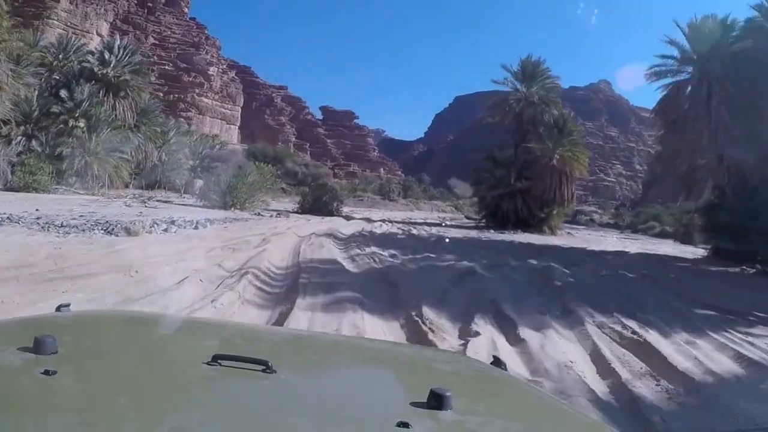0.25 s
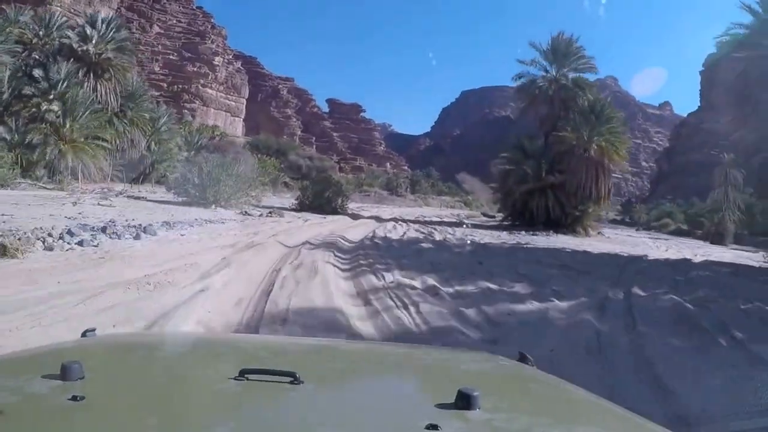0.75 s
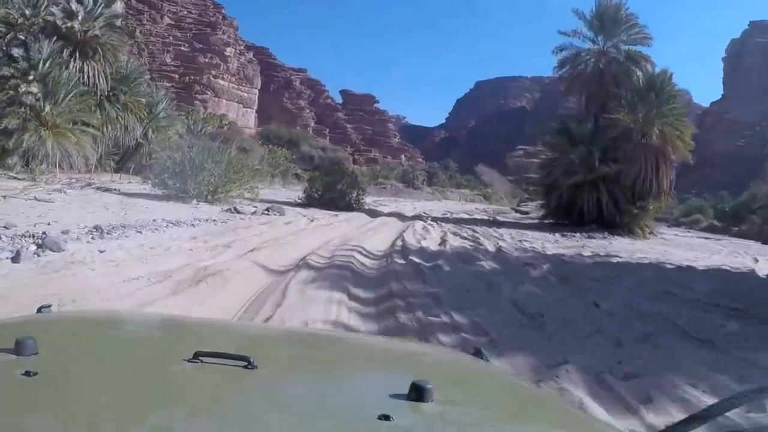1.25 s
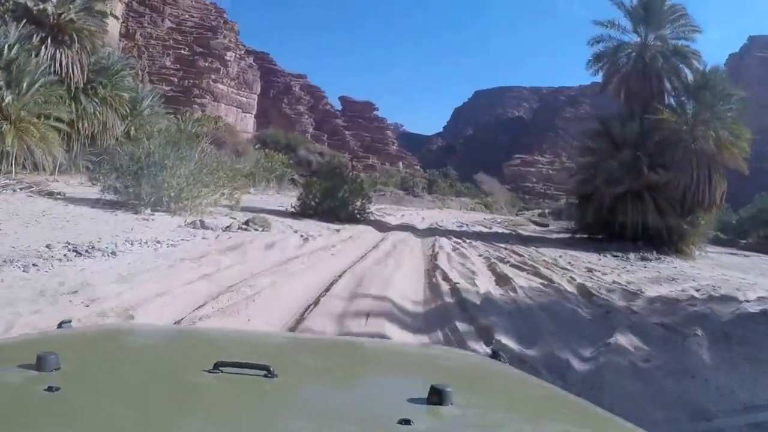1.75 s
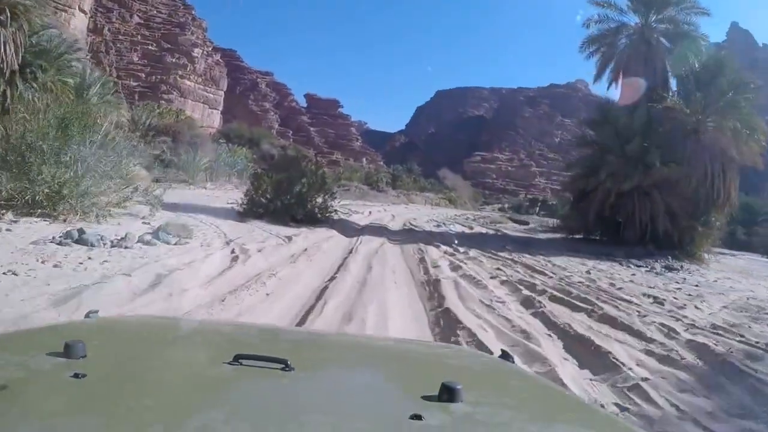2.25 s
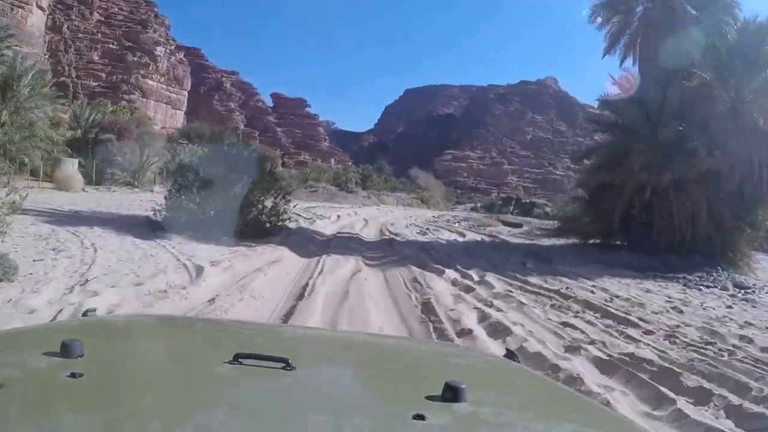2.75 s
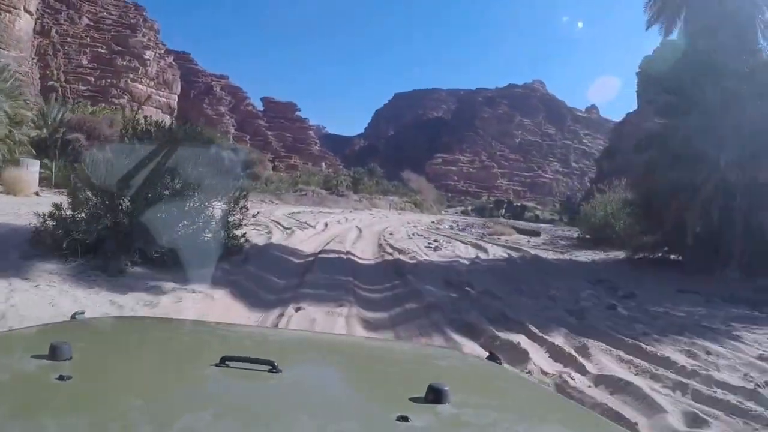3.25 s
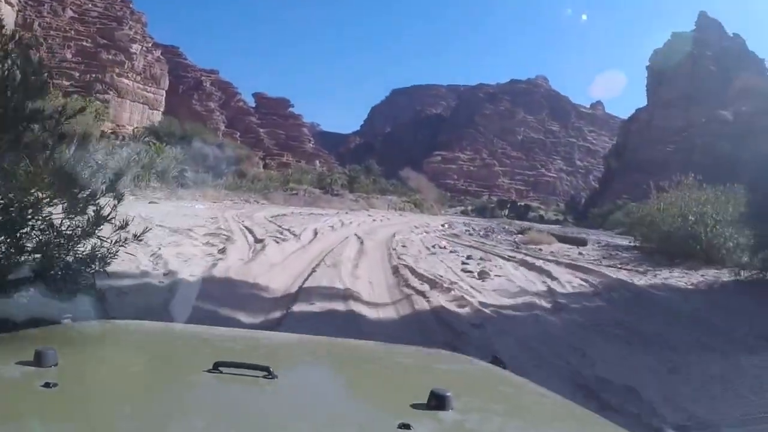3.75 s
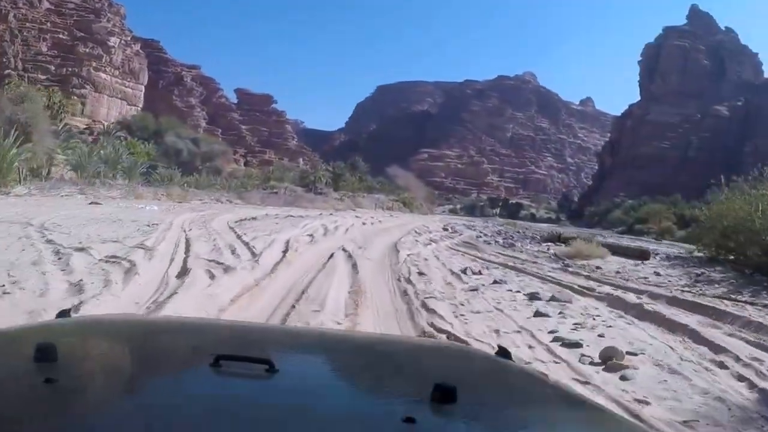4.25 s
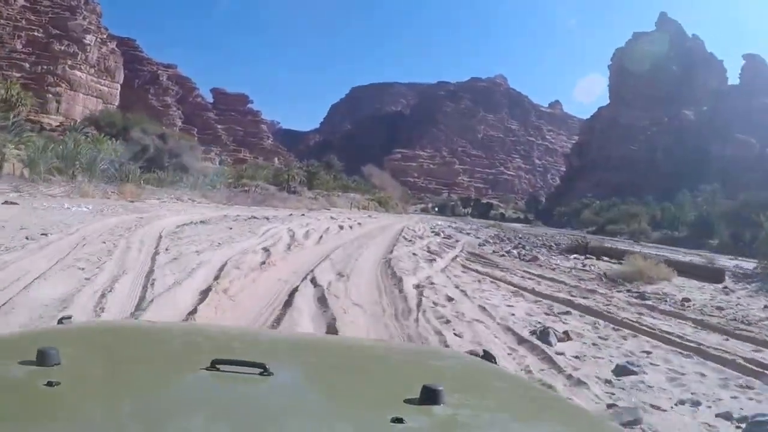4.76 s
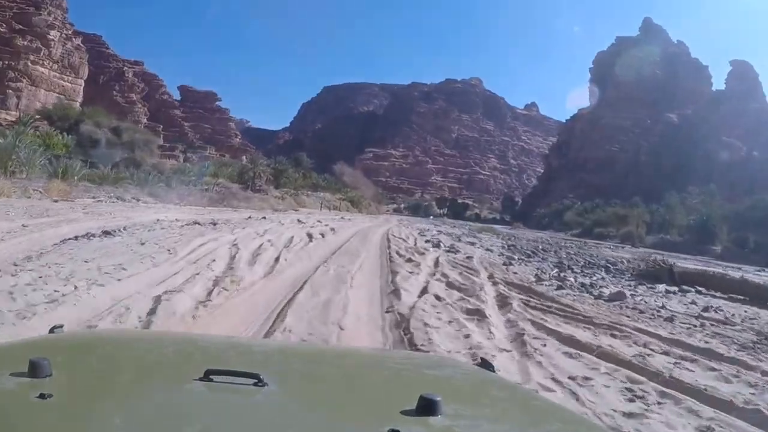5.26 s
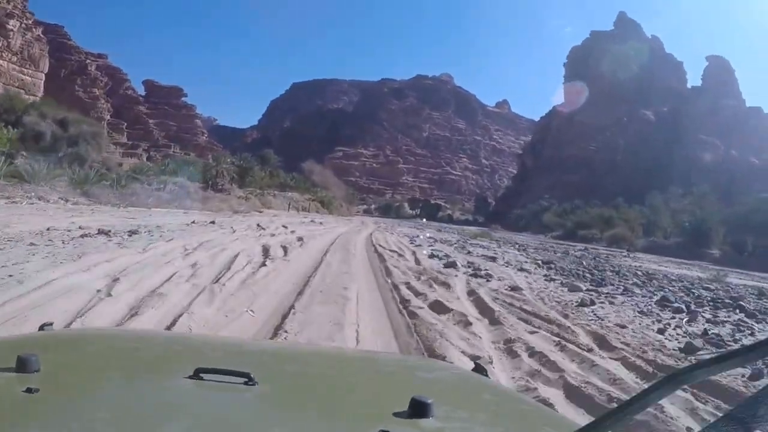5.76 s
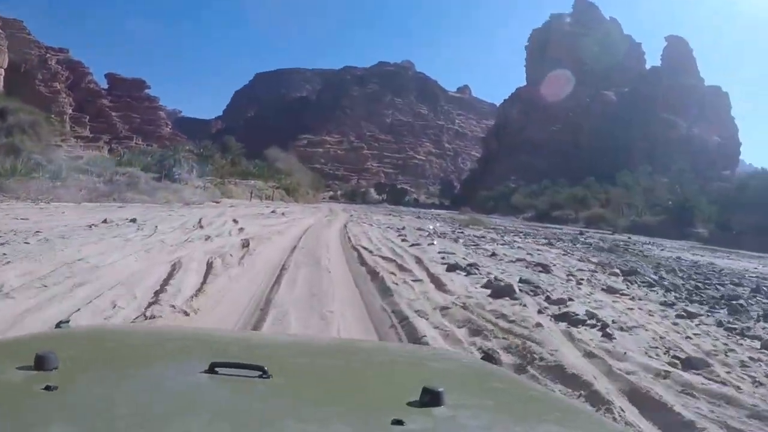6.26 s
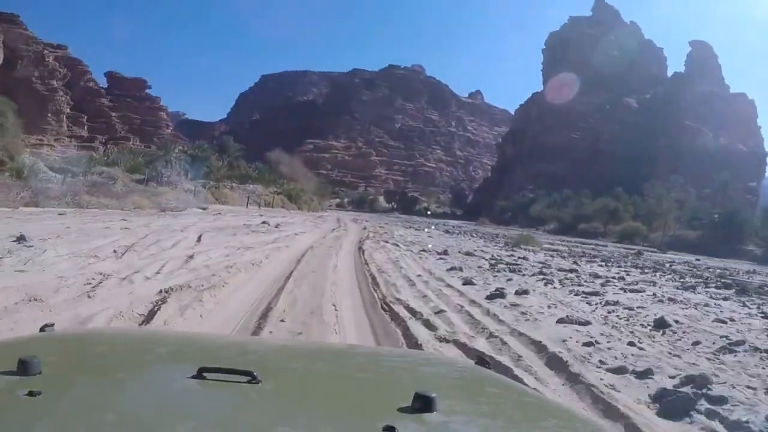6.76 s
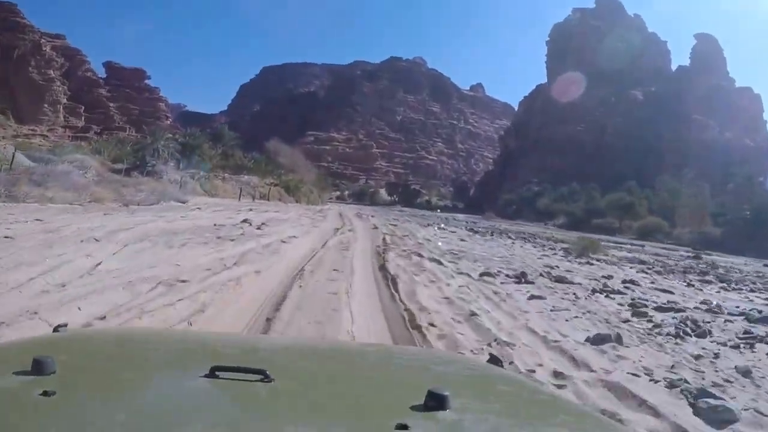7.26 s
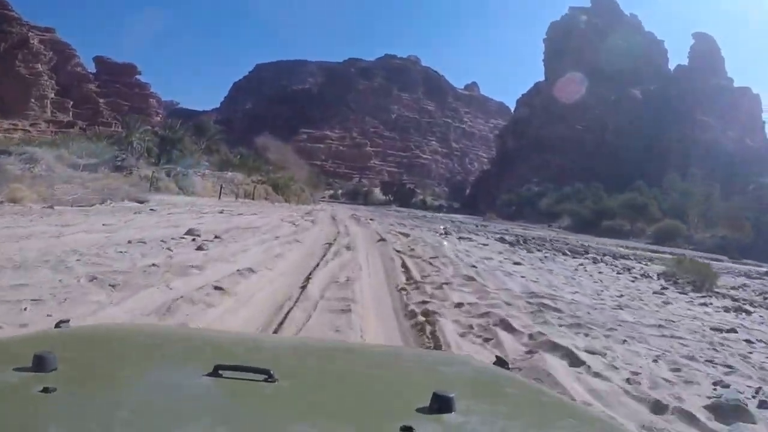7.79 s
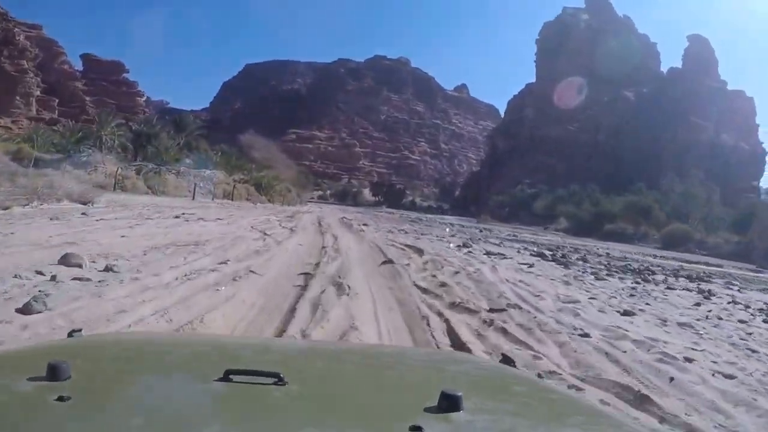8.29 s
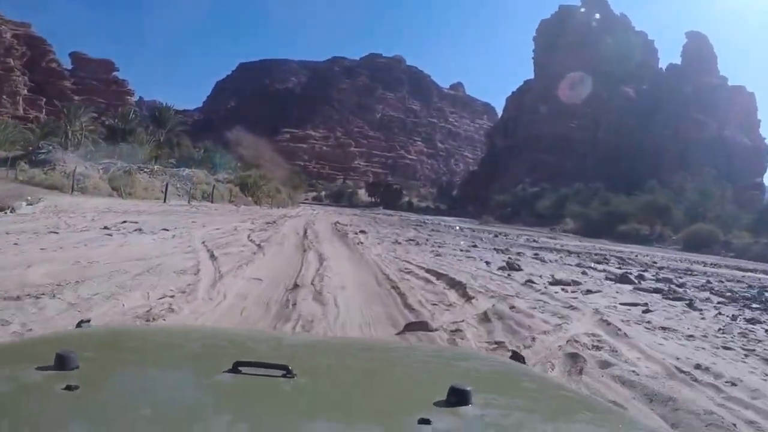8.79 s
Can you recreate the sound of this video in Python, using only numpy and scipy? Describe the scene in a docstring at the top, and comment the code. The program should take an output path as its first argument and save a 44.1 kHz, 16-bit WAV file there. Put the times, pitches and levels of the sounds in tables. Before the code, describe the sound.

An engine growls low inside a bumping vehicle cabin, its pitch sinking, then climbing past the middle and easing down. Low air pressure rumbles throughout, with muffled floor roar and fine trim chatter. Jolts bring dull floor thuds, short sheet-metal taps, dry plastic knocks and tiny jingles, densest early and just after halfway. Later the drone is steadier with sparse ticks. The microphone is inside, near the front seat, in mono.

```python
"""Off-road cabin on sand and stones

Inside a vehicle whose six-cylinder engine slows, pulls and slows again: a stack of gliding sine orders.
The cabin booms, thumps and roars with the ruts, as shaped noise, while the trim chatters.
Blows ring decaying notes in the floor and sheet metal; trim knocks and small metal parts jingle,
as noise bursts that excite resonances."""
import sys
import numpy as np
from scipy import signal
from scipy.fft import rfft, irfft, next_fast_len
from scipy.io import wavfile
from scipy.ndimage import uniform_filter1d, map_coordinates

SR = 44100
rng = np.random.default_rng(int(sys.argv[2]) if len(sys.argv) > 2 else 0)


def unload_audio(sound):
    """Save the sound as a 16-bit wav file, at the path given as the first command line argument."""
    columns = np.transpose(np.atleast_2d(sound))
    # keep every value between -1 and 1, then stretch to whole-number steps
    steps = np.round(np.clip(columns, -1, 1) * 32767)
    wavfile.write(sys.argv[1], SR, steps.astype(np.int16))


N = 398223
TIME = np.arange(N) / SR  # seconds

# throttle, as the base level of the engine orders: time_s, load_db
LOAD = [(0, -47), (0.4, -47), (0.75, -48.5), (1.05, -54), (2.1, -52.5), (2.45, -56.5), (2.7, -43.5),
        (3.25, -45), (3.9, -43), (4.5, -38.5), (4.75, -43), (5.1, -45), (5.6, -56), (6.1, -51),
        (6.5, -50.5), (6.9, -55.5), (7.3, -47.5), (7.9, -48.5), (8.4, -44), (8.65, -47), (9.03, -65.5)]
# engine speed: time_s, rate_hz (four-stroke cycles per second)
CYCLE_RATE = [(0.0, 24.64), (0.6, 23.44), (1.1, 22.96), (1.6, 21.96), (2.0, 21.94), (2.47, 19.72),
              (2.68, 21.52), (2.92, 21.7), (3.7, 23.3), (4.1, 24.28), (4.6, 25.6), (4.96, 26.82),
              (6.18, 29.98), (6.62, 29.92), (7.06, 27.76), (8.1, 25.28), (8.27, 25.66), (8.7, 24.96),
              (9.03, 23.92)]


def amp(db):
    """Decibels to gain."""
    return 10 ** (np.asarray(db) / 20)


def unit(x):
    """Scaled to rms 1."""
    return x / np.sqrt(np.mean(x ** 2) + 1e-20)


def along(points, hz):
    """Value at hz from (Hz, value) points on a log frequency axis."""
    f, v = np.transpose(points)
    return np.interp(np.log(hz + 1), np.log(f + 1), v)


def curves(rows):
    """One value per sample for each column after the time."""
    s, *columns = np.transpose(rows)
    return [np.interp(TIME, s, column) for column in columns]


def wobble(rate):
    """A smooth random curve, rate knots a second."""
    coarse = TIME[::64]
    knots = rng.standard_normal(int(N * rate / SR) + 4)
    return np.interp(TIME, coarse, map_coordinates(knots, [coarse * rate]))


def filtered(x, response):
    """x passed through a response given as a function of frequency."""
    m = next_fast_len(N + SR // 2)
    return irfft(rfft(x, m) * response(np.fft.rfftfreq(m, 1 / SR)), m)[:N]


def noise(spectrum, even, span):
    """Coloured noise of rms 1 whose own swells over span seconds are evened out by the share even."""
    x = filtered(rng.standard_normal(N), lambda hz: amp(along(spectrum, hz)))
    swell = np.sqrt(np.abs(uniform_filter1d(unit(x) ** 2, size=int(span * SR))) + 1e-3)
    return unit(x / swell ** np.clip(even, 0, 1))


def flurries(per_s, t60):
    """Random sudden swells that die away, a few large among many small."""
    t = TIME[:SR // 8]
    ticks = (rng.random(N) < per_s / SR) * amp(5.27 * rng.exponential(size=N).clip(0, 3))
    swell = t / t60 * 18 * amp(-60 * t / t60)
    return signal.fftconvolve(ticks, swell)[:N]


def cabin_boom():
    """Ruts shake the chassis and the cabin air booms: low noise that heaves and wavers."""
    # boom level: time_s, level_db
    heave = [(0.0, -6), (0.1, -25.5), (0.17, -13.5), (0.25, -19), (0.38, -12), (0.64, -14), (0.72, -18.5),
             (1.21, -11.5), (1.31, -23), (2.3, -19.5), (2.48, -13.5), (2.68, -21.5), (2.79, -14),
             (2.89, -21.5), (3.0, -13.5), (3.08, -22.5), (3.74, -14.5), (3.93, -20.5), (4.26, -13),
             (4.51, -19), (4.59, -12.5), (4.93, -12), (5.11, -18), (5.36, -12), (6.1, -16.5), (6.75, -12.5),
             (6.84, -17.5), (7.3, -18.5), (7.46, -11), (7.56, -21.5), (7.92, -16.5), (8.62, -14.5),
             (8.95, -11.5)]
    # colour of the boom: pitch_hz, relative level_db
    boom_colour = [(6, -35), (12, -25.5), (20, 1.5), (33, -1), (43, -9.5), (60, -15.5), (90, -31.5),
                   (150, -120)]
    level_db = curves(heave)[0] + 0.98 * wobble(8)
    return amp(level_db) * noise(boom_colour, even=0.81, span=0.099)


def ground():
    """Ruts shake the chassis: the floor thumps and roars, the trim chatters in grains."""
    # roughness of the track: time_s, shake_db (0 is even ground), thump level_db
    track = [(0.03, -1.5, -34), (0.31, 0.5, -34.5), (0.42, 6, -28), (0.5, 0, -22), (0.69, 3, -29),
             (0.8, -1, -33.5), (1.17, 5, -34), (1.55, 1.5, -27.5), (1.81, 5.5, -31), (2.0, 0, -27.5),
             (2.3, 0, -33), (2.9, -0.5, -32.5), (4.4, -0.5, -37.5), (4.77, 8.5, -17), (5.11, -2, -28.5),
             (5.37, 7.5, -27.5), (5.49, 3.5, -23.5), (5.61, 4.5, -26.5), (5.97, -3, -36),
             (6.2, -2.5, -30.5), (6.94, -2.5, -38.5), (7.5, -0.5, -34.5), (8.1, -1, -36), (8.4, 0, -34),
             (8.84, 0.5, -36.5), (9.0, 4, -36.5)]
    # noise colours of floor thump, floor roar and trim chatter: pitch_hz, relative level_db
    thump_colour = [(32, -12), (55, -8.5), (70, -13.5), (108, -8), (156, -18.5), (190, -18.5), (250, -37.5),
                    (420, -120)]
    roar_colour = [(100, -21.5), (170, -9), (262, -3), (340, -9), (395, -5), (464, -11), (554, -9),
                   (784, -12.5), (861, -20.5), (1600, -37.5), (2080, -66), (3520, -120)]
    chatter_colour = [(710, -24), (1200, -5.5), (2080, -4), (2900, -7.5), (3260, -9), (4930, -12.5),
                      (8210, -20), (12600, -20.5), (15200, -26.5)]
    shake_db, thump_db = curves(track)
    load_db = curves(LOAD)[0]
    thump = amp(thump_db) * noise(thump_colour, even=0.13, span=0.06)

    judder = wobble(12)  # quick shakes shared by floor and trim
    # the floor pulses once an engine cycle
    beat = 1 + 0.2 * np.cos(2 * np.pi * np.cumsum(curves(CYCLE_RATE)[0]) / SR)
    roar_swell = beat * (1 + 0.14 * flurries(25, t60=0.064)) * amp(0.37 * judder)
    roar = unit(roar_swell * noise(roar_colour, even=0.25, span=0.068))
    grains = (1 + 0.084 * flurries(110, t60=0.036)) * amp(1.0 * judder)
    chatter = unit(grains * noise(chatter_colour, even=0, span=.05))

    # the roar grows by 0.78 dB per dB of shake and 0.2 dB per dB of engine load
    roar_db = -37 + 0.78 * shake_db + 0.2 * (load_db - load_db.mean())
    chatter_db = -60 + shake_db
    return thump + amp(roar_db) * roar + amp(chatter_db) * chatter


def jingles():
    """Small metal parts chatter against each other for the length of a jolt and ring at thin high modes."""
    # jolts: start_s, level_db (drive, before the modes), length_s
    jolts = [(0.192, -55, 0.04), (0.548, -50, 0.0046), (0.722, -45.5, 0.031), (1.12, -50, 0.022),
             (1.185, -58, .02), (1.232, -55, .02), (1.418, -52, .012), (1.456, -56, .018),
             (1.471, -42, 0.023), (1.693, -51.5, 0.04), (1.763, -29, 0.027), (1.79, -36.5, 0.019),
             (1.855, -50, .004), (1.972, -51, 0.03), (2.164, -57, 0.055), (2.706, -49, .006),
             (2.933, -47, 0.011), (4.9, -53, 0.026), (5.161, -47, 0.0047), (8.62, -54, .016)]
    # modes of the metal parts: pitch_hz, width_hz (broadened 3.5 times below), relative level_db
    metal = [(6790, 24, -5), (10650, 64, -6.5), (11100, 28, -1.5), (11960, 27, 4), (12300, 160, -14),
             (13800, 35, -3), (14300, 38, -3), (14900, 61, 2)]
    out, t = np.zeros(N + SR), TIME[:8192]
    f = np.fft.rfftfreq(len(t), 1 / SR)
    for s, db, length in jolts:
        jolt = (1 - np.exp(-(t / 0.0014) ** 2)) / (1 + (t / max(length, .002)) ** 5.2)
        # sparse touches: about one sample in eight
        touches = jolt * rng.standard_normal(len(t)) * (rng.random(len(t)) < .12)
        ring = sum(amp(level + rng.normal(0, 4.7)) * 1j * f * 1.95 * w / (c * c - f * f + 3.5j * f * w)
                   for c, w, level in metal)
        click = amp(-15) * (f / 12000)  # bright direct sound of the contacts
        out[round(s * SR):][:len(t)] += amp(db + 15) * irfft(rfft(touches) * (ring + click))
    return out[:N]


def knocks():
    """Each trim knock is a flurry of contacts: the note of the part hit, its neighbours and a broad crack."""
    # knocks: start_s, level_db (4 dB below the peak), pitch_hz, length_s
    hits = [(0.201, -46, 3880, 0.05), (0.202, -46, 2020, 0.013), (0.376, -42, 2050, 0.012),
            (0.448, -50.5, 4200, 0.013), (0.483, -51.5, 2190, .012), (0.662, -43, 4260, 0.011),
            (0.719, -41, 2600, 0.022), (1.111, -44, 4460, 0.017), (1.671, -51, 2800, .012),
            (1.752, -51, 4800, .012), (1.763, -36.5, 2780, 0.017), (1.822, -44.5, 2900, 0.01),
            (1.856, -53, 4000, .004), (1.884, -43.5, 3530, 0.021), (2.0, -52, 5300, 0.017),
            (2.705, -47.5, 3380, 0.0058), (2.78, -51.5, 2400, 0.1), (3.056, -46.5, 4900, 0.0052),
            (3.448, -52, 4360, 0.024), (3.506, -47.5, 4280, 0.007), (3.513, -46, 2600, 0.0065),
            (4.434, -46.5, 2470, 0.042), (4.578, -44, 2330, 0.008), (4.626, -50, 4300, .012),
            (4.709, -44, 4370, 0.0077), (4.841, -44, 3620, 0.027), (5.321, -43, 4030, 0.019),
            (5.333, -50, 5500, 0.0069), (5.346, -36, 2490, 0.0054), (5.517, -45, 2100, 0.0083),
            (5.584, -46, 2540, .012), (5.61, -51, 2580, 0.011), (5.902, -44.5, 3400, 0.0092),
            (6.864, -50, 3650, 0.012), (7.193, -56, 4300, .008), (7.307, -53, 2490, 0.024),
            (7.69, -54, 2510, 0.007), (8.607, -51, 2800, 0.01), (8.682, -40.5, 4120, 0.034),
            (8.946, -50, 3600, 0.008), (8.962, -50, 3300, .012), (8.985, -59, 3600, .012)]
    # modes of the trim: pitch_hz, relative level_db
    trim = [(2130, 10), (2560, 2), (2870, 0.5), (3150, -11.5), (4250, -0.5), (4870, -2), (5600, -19)]
    out, t = np.zeros(N + SR), TIME[:4096]
    f = np.fft.rfftfreq(len(t), 1 / SR)

    def mode(hz, width):
        """Band-pass resonance with gain 1 at its centre."""
        return 1j * f * width / (hz ** 2 - f * f + 1j * f * width)

    for s, db, centre_hz, length in hits:
        length = max(length, .002)
        envelope = (1 - np.exp(-t / 0.0017)) * np.exp(-1.3 * t / length) / (1 + (t / length) ** 4)
        contacts = rng.standard_normal(len(t)) * envelope
        # low parts squeak on few modes, high ones crack broadly
        reach = .45 * min(1, centre_hz / 4000) ** 2
        # modes close to the note answer most
        neighbours = sum(amp(level + rng.normal(0, 2.4)) * np.exp(-(np.log(hz / centre_hz) / reach) ** 2)
                         * mode(hz, 0.051 * hz) for hz, level in trim)
        note = mode(centre_hz, 0.086 * centre_hz)
        crack = 2 * reach ** 2 * mode(centre_hz, 2 * centre_hz) ** 2
        dulled = rfft(contacts) / (1 + 1j * f / (1.95 * centre_hz)) ** 2
        flurry = irfft(dulled * (note + 0.76 * neighbours + crack))
        out[round(s * SR):][:len(t)] += amp(db + 4.0) * flurry / np.abs(flurry).max()
    return out[:N]


def struck(blows, t60, spread, share):
    """Each blow rings a note and three weaker neighbours at random steps, with a soft start."""
    out, t = np.zeros(N + SR), TIME[:SR // 4]
    for s, db, pitch_hz in blows:
        # two neighbours below the note, one above
        steps = np.exp(spread * (np.array([[-1.5], [-.7], [.6]]) + rng.uniform(0, .6, (3, 1))))
        neighbours = np.sin(2 * np.pi * steps * pitch_hz * t).sum(axis=0)
        notes = np.sin(2 * np.pi * pitch_hz * t) + share * neighbours
        onset = 1 - np.exp(-t * pitch_hz * 2.5)
        out[round(s * SR):][:len(t)] += amp(db - 60 * t / t60) * onset * notes
    return out[:N]


def sheet_taps():
    """Stones and fittings tap the sheet metal, which rings short notes."""
    # taps: start_s, level_db (main note, before onset and decay), pitch_hz
    taps = [(0.048, -33.5, 920), (.437, -36, 1120), (0.518, -33.5, 940), (0.666, -28, 970),
            (.728, -34, 1070), (0.837, -31.5, 926), (1.136, -27, 804), (1.767, -36, 1090),
            (1.825, -31.5, 1015), (4.709, -32, 1184), (4.822, -26, 915), (4.965, -34, 1010),
            (5.043, -32, 910), (5.106, -32, 955), (5.125, -30, 870), (5.203, -31.5, 916), (5.33, -25, 933),
            (5.348, -22, 823), (5.37, -23.5, 786), (5.618, -34, 890), (5.642, -31, 900), (5.703, -35, 930),
            (5.903, -31, 1170), (6.256, -32, 880), (6.498, -34.5, 840), (6.857, -36.5, 930),
            (7.02, -42, 900), (7.366, -35, 960), (7.503, -34.5, 890), (7.656, -35, 920), (7.718, -38, 920),
            (7.88, -36, 920), (8.015, -30, 846), (8.139, -34.5, 935), (8.218, -39, 720), (8.685, -31, 1230)]
    return struck(taps, t60=0.038, spread=0.301, share=0.27)


def floor_thuds():
    """Bottomed springs thud on the floor pan, which rings lower and a little longer."""
    # thuds: start_s, level_db (main note, before onset and decay), pitch_hz
    thuds = [(0.201, -24.5, 323), (.228, -30, 780), (0.406, -15, 373), (0.667, -27, 483), (1.061, -27, 503),
             (1.113, -24, 396), (1.825, -22.5, 502), (2.911, -21, 356), (4.568, -21, 383), (4.64, -17, 377),
             (4.661, -14.5, 386), (4.757, -25, 563), (4.795, -25, 613), (4.82, -19, 393), (5.257, -24, 340),
             (5.303, -16, 380), (5.368, -23, 375), (5.396, -18.5, 358), (5.54, -17, 353), (5.579, -25, 540),
             (5.622, -24.5, 558)]
    return struck(thuds, t60=0.065, spread=0.385, share=0.29)


def axle_bumps():
    """Heavy blows through the axle ring deep notes with the longest decay."""
    # bumps: start_s, level_db (main note, before onset and decay), pitch_hz
    bumps = [(.401, -16, 112), (1.119, -16.5, 102), (1.821, -18.5, 98.3), (4.725, -13.5, 137),
             (4.865, -26, 114), (5.614, -18, 130)]
    return struck(bumps, t60=0.24, spread=0.254, share=0.28)


def whine():
    """Brackets sing under load: two thin, fuzzy notes of narrow noise that grow with engine load."""
    half_width_hz, over_load_db = 30, -35

    def peaks(f):
        """Resonance gain around both notes."""
        return sum(1 / (1 + ((f - hz) / half_width_hz) ** 2) for hz in (2810, 2990))

    level_db = curves(LOAD)[0] + over_load_db + 4.5 * wobble(4)
    return amp(level_db) * unit(filtered(rng.standard_normal(N), peaks))


def spells(rows):
    """Gain that swells in ahead of each start, holds for the length and fades."""
    swell_s, fade_s = 0.3, 0.2
    gain = 0
    for s, length, db in rows:
        corners = [s - swell_s, s, s + length, s + length + fade_s]
        gain = gain + amp(db) * np.interp(TIME, corners, [0, 1, 1, 0]) ** 2
    return gain


def engine():
    """Orders of the four-stroke cycle: uneven cylinders fill in every order from 3 up; some drone out."""
    # how the cabin passes the filled-in orders: pitch_hz, level_db
    cabin = [(60, 3), (100, 7.5), (125, 4), (142, 2.5), (170, -9.5), (225, 0.5), (262, 2.5), (330, -5.5),
             (420, -5.5), (560, -11), (700, -15), (790, -12), (870, -26.5)]
    # spells in which one order drones out, by order of the cycle: start_s, length_s, level_db
    drones = {2: [(7.0, 0.23, -26.5)], 3: [ (0.95, 1.22, -28.5), (3.3, 0.72, -23), (4.2, 0.4, -29),
              (7.2, 1.35, -33)], 4: [(1.6, 0.3, -35.5), (4.25, 0.45, -29), (6.4, 0.75, -39.5),
              (7.3, 1.357, -28), (8.38, 0.089, -31)], 5: [(.8, 1.1, -39)], 8: [(8.25, 0.41, -42.5)],
              11: [(.9, 1.3, -43.5), (2.7, 1.29, -40)], 14: [(.6, 0.65, -47.5), (2.8, 1.02, -41)],
              15: [(8.15, 0.37, -43)], 17: [(.55, 1.1, -46.5), (4.1, 0.26, -47.5)], 18: [(3.3, 0.36, -44)],
              20: [(2.8, 0.26, -42), (4.2, 0.52, -44.5)], 23: [(3.8, 0.51, -43)], 33: [(1.3, 0.63, -50.5)],
              6: [(2.35, 0.5, -38), (3.2, 1.206, -30)], 9: [(4.22, 0.31, -31.5)], 10: [(1.0, 1.03, -41.5),
              (3.25, 1.86, -38.5), (8.2, 0.23, -38)], 12: [(1.3, 0.83, -38), (2.75, 0.91, -33),
              (4.5, 0.18, -34), (8.4, 0.32, -42.5)], 36: [(2.8, 0.5, -49)], 24: [(4.45, 0.23, -42.5)]}
    hop = 8  # all orders lie low, so every eighth sample carries them
    cycle_hz, load_db = curves(CYCLE_RATE)[0][::hop], curves(LOAD)[0][::hop]
    cycle_phase = 2 * np.pi * np.cumsum(cycle_hz) * hop / SR
    odd_db = -1.5  # odd orders repeat only every second turn of the crank and are weaker
    sway_db = 3  # each order comes and goes on its own
    waver_db = 2  # a drone wavers less, slowly and in quick shivers

    gains = {}
    for order, rows in drones.items():
        waver = waver_db * (wobble(4) + wobble(17)) / np.sqrt(2)
        gains[order] = (spells(rows) * amp(waver))[::hop]
    for order in range(3, 40):
        cabin_db = along(cabin, order * cycle_hz)
        level_db = load_db + odd_db * (order % 2) + cabin_db + sway_db * wobble(3.2)[::hop]
        gains[order] = np.hypot(gains.get(order, 0), amp(level_db))

    out = np.zeros(len(cycle_phase))
    for order, gain in gains.items():
        # uneven firing blurs the high orders
        smear = .0008 * min(order, 30) ** 2 * wobble(7)[::hop]
        out += np.sqrt(2) * gain * np.sin(order * cycle_phase + smear + rng.uniform(0, 2 * np.pi))
    return signal.resample_poly(out, hop, 1)[:N]


def scene():
    """Everything heard from the front seat, in one channel."""
    body = cabin_boom() + ground()
    loose_parts = jingles() + knocks()
    blows = sheet_taps() + floor_thuds() + axle_bumps()
    return (body + loose_parts + blows + whine() + engine())[None]


def record(dry):
    """A soft limit rounds off the tallest swings; a steep low-pass ends the treble."""
    top_hz = 15250
    soft = dry[0] / (1 + np.abs(dry[0] / .7) ** 6) ** (1 / 6)
    return filtered(soft, lambda hz: 1 / (1 + (hz / top_hz) ** 160))[None]


dry = scene()
out = record(dry)
unload_audio(out)
```